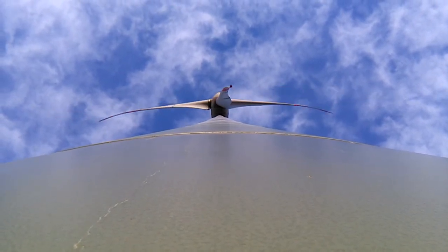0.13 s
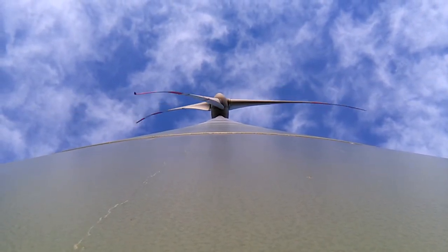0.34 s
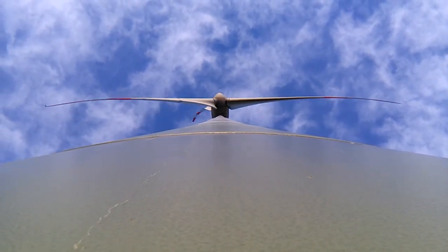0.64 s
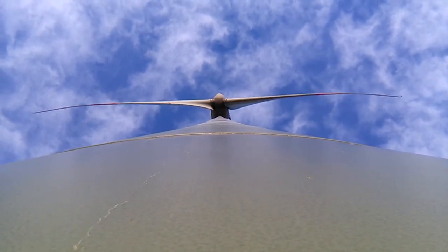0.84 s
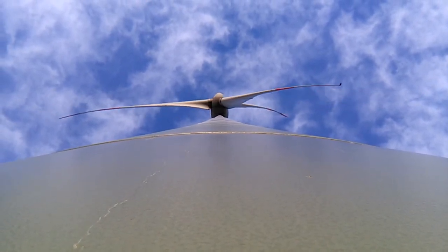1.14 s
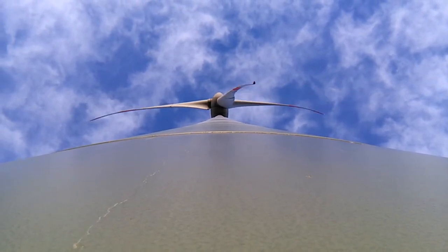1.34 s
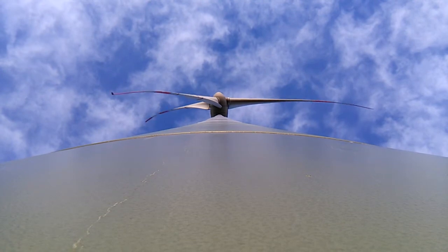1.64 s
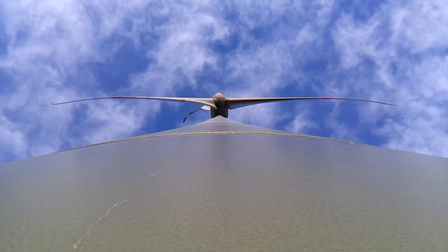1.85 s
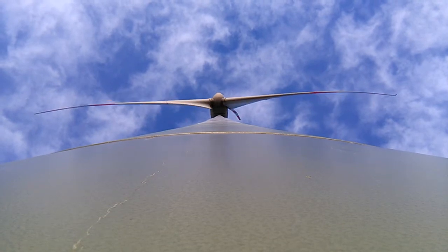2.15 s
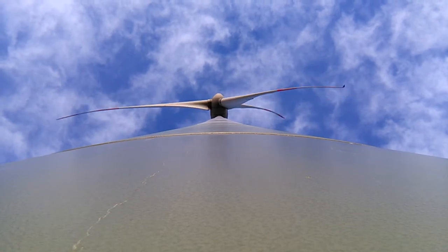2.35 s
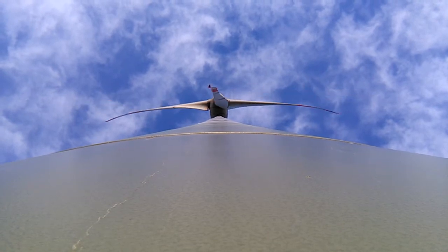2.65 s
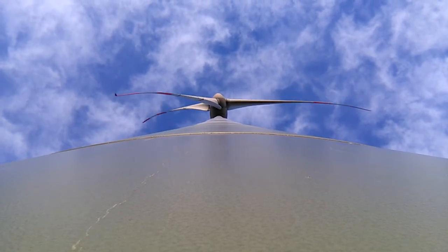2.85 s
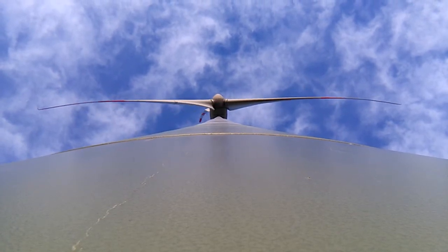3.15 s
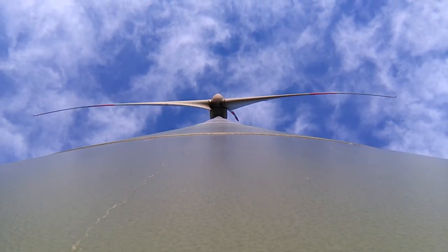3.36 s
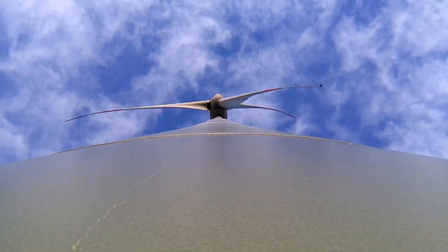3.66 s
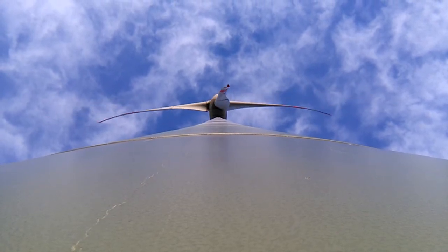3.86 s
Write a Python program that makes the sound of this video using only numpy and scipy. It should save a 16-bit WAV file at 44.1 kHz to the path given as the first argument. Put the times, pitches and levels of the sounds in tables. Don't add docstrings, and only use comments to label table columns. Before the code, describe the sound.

Outdoors beneath a wind turbine, three airy blade whooshes swell and fade at a steady pace. Wind buffets the small microphone with lumpy low thuds, growing stronger later, while air across its port whistles faintly.

```python
import sys
import numpy as np
from scipy import signal
from scipy.io import wavfile
from scipy.ndimage import uniform_filter1d

SR = 44100
rng = np.random.default_rng(int(sys.argv[2]) if len(sys.argv) > 2 else 0)


def gain_from_decibels(decibels):
    exponent = np.asarray(decibels, float) / 20
    return 10 ** exponent


def to_wav(sig):
    pcm = np.clip(np.atleast_2d(sig), -1, 1) * 32767
    pcm = np.round(pcm).astype(np.int16)
    wavfile.write(sys.argv[1], SR, pcm.T)


N = 176400
T = np.arange(0, N + 128, 64) / SR

# pitch_hz, level_db
FAR_SPECTRUM = [(300, -10.5), (600, -2.5), (1100, -2), (1500, -2.5), (2300, -15), (4000, -25), (7500, -31),
                (9000, -42)]
FAR_DB = -59

# time_s, level_db
GUST_STRENGTH = [(0.0, -51.5), (0.36, -51.5), (0.5, -44), (.68, -43), (.74, -38), (1.1, -38), (1.44, -35),
                 (1.66, -39.5), (2.12, -35), (2.22, -37), (2.31, -42.5), (2.4, -36.5), (2.5, -41),
                 (2.64, -36), (3.1, -38), (3.57, -36), (3.9, -34), (4.0, -30.5)]
# pitch_hz, level_db
RUMBLE_SPECTRUM = [(30, -18.5), (55, 0.5), (105, 0.3), (200, -6.5), (285, -12.5), (450, -27), (650, -39.5),
                   (900, -47)]
RUMBLE_TRIM_DB = -0.03
BRIGHTEN_PER_DB = 0.36

# time_s, level_db, pitch_hz
MOAN_PATH = [(0, -54.5, 950), (.41, -64, 1052), (.66, -49.5, 1270), (.75, -60, 1221), (1.0, -57, 1166),
             (1.15, -54, 951), (1.34, -54.5, 943), (1.6, -65.5, 1030), (1.97, -49, 1053), (2.12, -63, 1100),
             (2.36, -55, 1050), (2.54, -52, 1039), (2.75, -52.5, 1002), (3.12, -51, 1171), (3.3, -54, 950),
             (3.5, -50, 970.5), (3.78, -47, 949), (4, -50.5, 1019)]
MOAN_WIDTH_HZ = 238

# pass_s, edge_db, tip_db, stretch (times as long)
BLADE_PASSES = [
    (-.8, -51, -63, 1.0),
    (0.42, -50.5, -61.5, 1.05),
    (1.675, -47, -60, 1.0),
    (2.925, -51, -62, 1.05),
    (4.15, -52, -62.5, 1.03),
]
# time_from_pass_s, level_db; it steps up past the tower's shadow
EDGE_SWEEP = [(-0.62, -28.5), (-0.39, -24), (-0.35, -11.5), (-0.16, -7), (-0.045, -1), (0.082, -1),
              (0.22, -12), (0.41, -17), (0.52, -26)]
# time_from_pass_s, level_db
TIP_LOUDNESS = [(-0.6, -23), (-0.46, -18), (-0.425, -7.5), (-0.2, -7.5), (-.05, -.5), (0.05, -1.5),
                (0.2, -10), (0.4, -15.5), (0.53, -27)]
# pitch_hz, level_db
EDGE_SPECTRUM = [(1400, -15), (1900, -8.5), (2400, -3), (3000, 1), (4200, -4), (4700, -10.5), (5300, -14.5),
                 (6000, -23)]
# pitch_hz, level_db
TIP_SPECTRUM = [(4800, -7), (5600, -1.5), (6300, 0), (7800, -1), (8300, -14), (9000, -16), (11000, -16.5),
                (14000, -27)]
EDGE_LAG_S_PER_OCTAVE, TIP_LAG_S_PER_OCTAVE = 0.015, 0.015
APPROACH_FOCUS_PER_OCTAVE, TIP_FOCUS_PER_OCTAVE = 0.9, 1.5

# peak_s, level_db,
# length_s, pitch_hz
WASHES = [(0.11, -56, 0.33, 560), (0.045, -51, 0.15, 188), (0.343, -56, 0.039, 280), (1.5, -37, 0.048, 59),
          (2.24, -60, 0.089, 1370), (3, -36.5, 0.046, 80), (3.19, -35.5, 0.021, 89.5),
          (.15, -56, 0.27, 1700), (0.6, -55.5, 0.1, 1300), (1.21, -59.5, 0.23, 1440),
          (1.315, -42, 0.044, 456), (1.29, -35, 0.065, 233), (1.18, -36.5, .02, 254),
          (2.06, -40, 0.053, 264), (3.33, -41, 0.068, 294), (0.086, -44, 0.059, 122),
          (0.363, -49, 0.058, 114), (1.982, -40, 0.019, 500), (1.98, -29, 0.0099, 243),
          (2.52, -59.5, 0.27, 1320), (1.926, -54.5, 0.13, 1210), (3.6, -46.5, 0.033, 720),
          (3.77, -57, 0.19, 1410), (0.76, -35.5, 0.042, 74), (1.234, -25, 0.04, 64),
          (1.6, -30.5, 0.028, 71.6), (2.2, -29.5, 0.019, 112.5), (2.55, -30.5, 0.0453, 107),
          (3.85, -31.5, 0.084, 75)]
# peak_s, level_db, length_s, pitch_hz
EDDY_FLARES = [(.23, -52, 0.08, 2800), (.3, -58, 0.067, 3430), (.4, -53.5, 0.099, 3970),
               (.5, -61, 0.07, 3650), (.56, -59, 0.045, 2830), (1.3, -66, 0.049, 2780),
               (1.53, -61, .04, 3930), (1.9, -60, 0.043, 2913), (2.18, -64, 0.045, 3180),
               (2.58, -62, 0.046, 2670), (2.66, -59, 0.061, 3300), (2.73, -57, .05, 2730),
               (2.76, -65, 0.079, 3695), (1.72, -51.5, 0.097, 3090), (3.94, -58, 0.088, 2800),
               (2.89, -57, .03, 1940), (2.87, -60, .04, 3710), (3.05, -54.5, 0.077, 3250),
               (3.15, -56, 0.03, 2807), (3.28, -66, 0.14, 4274), (.56, -65, 0.058, 7500),
               (2.5, -82, 0.031, 7650), (2.62, -71, 0.033, 7020), (2.75, -68, 0.044, 7600),
               (3.3, -75.5, .08, 7283), (3.74, -76, 0.029, 7515), (3.86, -71, .03, 7000),
               (3.845, -77, .025, 11900), (3.92, -79, .02, 11500)]
# peak_s, level_db, length_s, pitch_hz
WIND_BUFFETS = [(0.469, -39, 0.072, 112), (0.615, -43, 0.025, 230), (0.791, -35, 0.042, 143),
                (0.912, -30, 0.034, 139), (1.05, -45.5, 0.05, 138), (1.283, -25, 0.054, 83),
                (1.34, -30, 0.025, 140), (1.433, -31, 0.03, 69.7), (1.576, -34, 0.033, 141),
                (1.761, -42.5, 0.017, 155), (1.982, -27, 0.016, 244), (2.072, -29, 0.058, 71.7),
                (2.191, -31.5, 0.025, 140), (2.395, -35, 0.049, 119), (2.461, -35.5, 0.025, 138),
                (2.557, -35.5, 0.042, 241), (2.68, -38, 0.045, 199), (2.775, -36, 0.051, 166),
                (2.923, -36.5, 0.024, 116), (3.101, -45.5, 0.025, 280), (3.208, -42.5, 0.085, 233.6),
                (3.31, -31.5, 0.063, 119.5), (3.373, -26.5, 0.028, 81.6), (3.516, -44.5, 0.061, 332),
                (3.537, -34.5, 0.049, 117), (3.634, -32.5, 0.034, 81.6), (3.658, -41, 0.056, 279.3),
                (3.85, -33.5, 0.036, 202), (3.89, -43.5, 0.075, 565), (3.947, -31.5, 0.026, 173)]
BUFFET_WIDTH_OCTAVES, BUFFET_TRIM_DB = 1.4, 1.5
BUFFET_TILT_DB = -2.5
# peak_s, level_db, length_s, pitch_hz
WHISTLES = [(.53, -56, .03, 1020), (.68, -55, 0.036, 1240), (.9, -64, 0.036, 1160), (1.02, -57, .02, 1240),
            (1.04, -55.5, .02, 940), (1.96, -54, .025, 980), (2.56, -55, .04, 1054),
            (2.76, -53, 0.039, 945), (2.93, -53, .03, 1080), (3.03, -49.5, 0.026, 1066),
            (3.17, -54, .03, 1160), (3.21, -55, 0.029, 1340), (3.25, -54, 0.018, 950),
            (3.39, -49, 0.02, 970), (3.57, -47, .04, 1003), (3.74, -47.5, 0.029, 947),
            (3.87, -55, .02, 980)]
# peak_s, level_db, length_s, pitch_hz
AIR_FLICKS = [
    (.752, -47.5, 0.0057, 730),
    (1.306, -43, 0.0073, 810),
    (3.794, -44.5, 0.0074, 800),
    (1.745, -34, 0.0083, 170),
    (.605, -45.5, 0.01, 300),
    (.705, -43, 0.014, 210),
    (2.172, -42, 0.011, 260),
    (3.7, -38, 0.009, 280),
    (.92, -41, .015, 290),
    (.79, -52.5, 0.024, 340),
]

# pitch_hz, width_hz, level_db
HOUSING_PEAKS = [(2080, 107, -5.5), (2850, 460, 2), (3480, 170, -4), (3670, 130, 2.5), (4290, 170, 3),
                 (4570, 220, -2.5), (4960, 300, 3), (5660, 330, -5.5), (6400, 400, 0), (7100, 440, 2.5),
                 (7500, 400, 3)]
SELF_NOISE_DB = -77.5


def rms_one(x):
    return x / np.sqrt(np.mean(x ** 2) + 1e-20)


def in_time(rows, t=T):
    s, *columns = np.transpose(rows)
    return [np.interp(t, s, column) for column in columns]


def spread(v):
    return np.interp(np.arange(N), T * SR, v)


def drift(rate_hz):
    r = np.exp(-2 * np.pi * rate_hz * T[1])
    slow = signal.lfilter([1], [1, -2 * r, r * r], rng.standard_normal(2 * len(T)))
    return rms_one(slow[len(T):])


def band(x, low_hz, high_hz):
    edges_hz = [low_hz, min(high_hz, 0.45 * SR)]
    return signal.sosfilt(signal.butter(2, edges_hz, "band", fs=SR, output="sos"), x)


def banded(spectrum, gain_at, together_db, own_db, slow, fast, count):
    hz, db = np.transpose(spectrum)
    edges = np.geomspace(hz[0], hz[-1], count + 1)
    mids = np.sqrt(edges[1:] * edges[:-1])
    gains = gain_from_decibels(np.interp(np.log(mids), np.log(hz), db))
    gains = gains / np.sqrt(np.sum(gains ** 2 * np.diff(edges)) * 2 / SR)
    white = rng.standard_normal((2, N + SR // 10))
    shared_db = together_db * drift(slow)
    out = np.zeros(N)
    for k, mid in enumerate(mids):
        noise = band(white[k % 2], edges[k], edges[k + 1])[-N:]
        flicker = gain_from_decibels(shared_db + own_db * drift(fast))
        out += gains[k] * noise * spread(flicker * gain_at(mid))
    return out


def puffs(rows, octaves, attack_share):
    run = SR // 10
    out = np.zeros(N)
    white = rng.standard_normal((2, N + run))
    for k, (s, db, length, hz) in enumerate(rows):
        length = np.clip(length, 0.006, 0.4)
        low, high = hz * 2 ** (-octaves / 2), hz * 2 ** (octaves / 2)
        a = max(int((s - 3 * length) * SR), 0)
        b = min(int((s + 3 * length) * SR) + run // 2, N)
        x = band(white[k % 2, a:b + run], low, high)
        x = x / np.sqrt(uniform_filter1d(x ** 2, int(SR * max(2 / hz, 0.01))) + 1e-9)
        u = (np.arange(a - run, b) / SR - s + 0.5 / hz) / length
        shape = np.exp(-np.where(u < 0, u / attack_share, u) ** 2)
        out[a:b] += gain_from_decibels(db) * band(x * shape, low * 0.76, high * 1.057)[run:]
    return out


def distant_wash():
    return gain_from_decibels(FAR_DB) * banded(FAR_SPECTRUM, lambda hz: 1, 1.0, 2.7, slow=3.2, fast=9.4, count=12)


def wind_rumble():
    db, = in_time(GUST_STRENGTH)
    tilt = BRIGHTEN_PER_DB * (db + 37.0)

    def gust_gain(hz):
        return gain_from_decibels(db + RUMBLE_TRIM_DB + tilt * np.log2(hz / 100))

    return banded(RUMBLE_SPECTRUM, gust_gain, 2.3, 1.37, slow=23, fast=12.5, count=10)


def port_moan():
    db, hz = in_time(MOAN_PATH)
    cut = signal.butter(1, MOAN_WIDTH_HZ / 2, fs=SR, output="sos")
    i, q = signal.sosfilt(np.vstack([cut, cut]), rng.standard_normal((2, N)))
    phase = 2 * np.pi * np.cumsum(spread(hz * (1 + 0.05 * drift(12)))) / SR
    tone = rms_one(i * np.cos(phase) + q * np.sin(phase))
    return spread(gain_from_decibels(db - 2.5 + 1.65 * drift(13))) * tone


def sweep(edge_or_tip, loudness, lag_s, focus):
    power = 0
    for pass_s, edge_db, tip_db, stretch in BLADE_PASSES:
        t = (T - pass_s - lag_s) / stretch
        shape_db = in_time(loudness, t)[0] * np.where(t < 0, focus, 1)
        level_db = edge_db if edge_or_tip == "edge" else tip_db
        power = power + gain_from_decibels(level_db + shape_db) ** 2
    return np.sqrt(power)


def edge_swish():
    def gain(hz):
        octaves = np.log2(hz / 3000)
        focus = 1 + APPROACH_FOCUS_PER_OCTAVE * max(octaves, 0)
        return sweep("edge", EDGE_SWEEP, -EDGE_LAG_S_PER_OCTAVE * octaves, focus)

    return banded(EDGE_SPECTRUM, gain, 0.94, 2.0, slow=21, fast=8.6, count=12)


def tip_hiss():
    def gain(hz):
        lag_s = TIP_LAG_S_PER_OCTAVE * np.log2(7000 / hz)
        focus = 1 + TIP_FOCUS_PER_OCTAVE * abs(np.log2(hz / 7200))
        return sweep("tip", TIP_LOUDNESS, lag_s, focus)

    return banded(TIP_SPECTRUM, gain, 0.66, 2.14, slow=21, fast=11, count=10)


def air_washes():
    return puffs(WASHES, 1.12, attack_share=0.84)


def eddy_flares():
    return puffs(EDDY_FLARES, 0.35, attack_share=0.85)


def wind_buffets():
    rows = []
    for s, db, length, hz in WIND_BUFFETS:
        tilt_db = BUFFET_TILT_DB * max(np.log2(hz / 150), 0)
        rows.append((s, db + BUFFET_TRIM_DB + tilt_db, length, hz))
    return puffs(rows, BUFFET_WIDTH_OCTAVES, attack_share=0.81)


def port_whistles():
    return puffs(WHISTLES, 0.23, attack_share=1.0)


def air_flicks():
    return puffs(AIR_FLICKS, 1.08, attack_share=0.29)


def scene():
    turbine = edge_swish() + tip_hiss() + eddy_flares()
    wind = wind_rumble() + air_washes() + wind_buffets() + air_flicks()
    port = port_moan() + port_whistles()
    return (distant_wash() + wind + port + turbine)[None]


def housing_filter(hz, width_hz, db):
    w, a = 2 * np.pi * hz / SR, gain_from_decibels(db / 2)
    k = np.sin(w) * width_hz / hz / 2
    top = [1 + k * a, -2 * np.cos(w), 1 - k * a]
    bottom = [1 + k / a, -2 * np.cos(w), 1 - k / a]
    return np.array(top + bottom) / (1 + k / a)


def band_limit(x):
    return signal.sosfilt(signal.butter(12, 14150, fs=SR, output="sos"), x)


def record(dry):
    filters = [housing_filter(*row) for row in HOUSING_PEAKS]
    low_cut = signal.butter(4, 40, "high", fs=SR, output="sos")
    x = signal.sosfilt(np.vstack(filters + [low_cut]), dry)
    hiss = spread(gain_from_decibels(SELF_NOISE_DB + 1.1 * drift(8))) * rng.standard_normal(x.shape)
    return band_limit(x + hiss)


dry = scene()
out = record(dry)
to_wav(out)
```